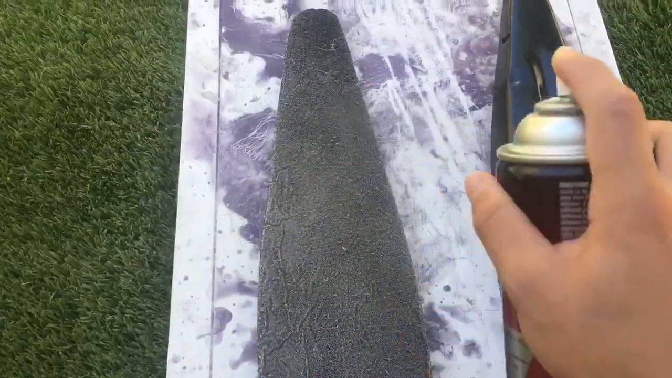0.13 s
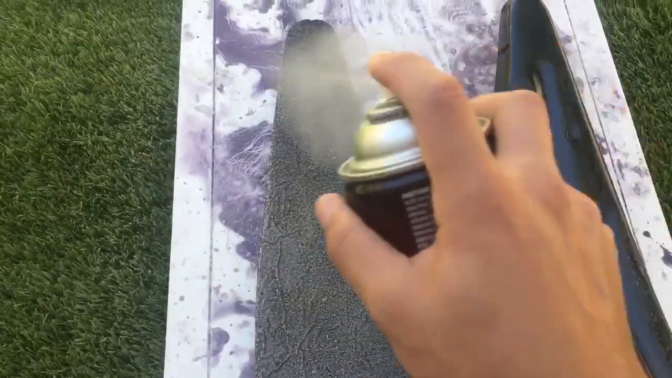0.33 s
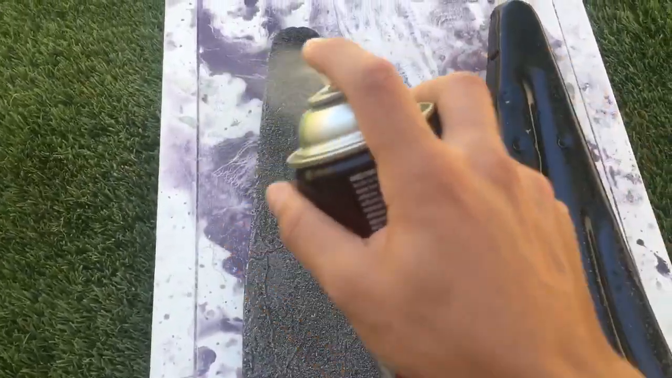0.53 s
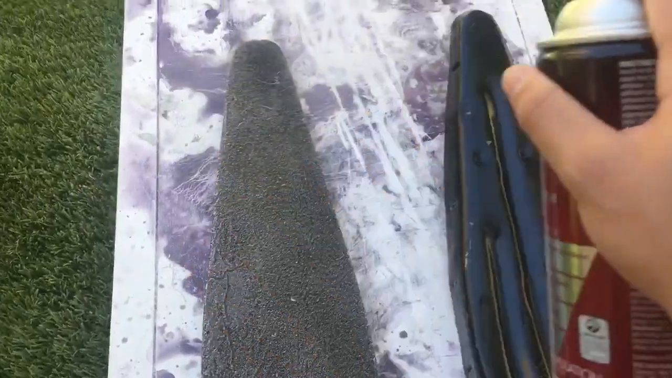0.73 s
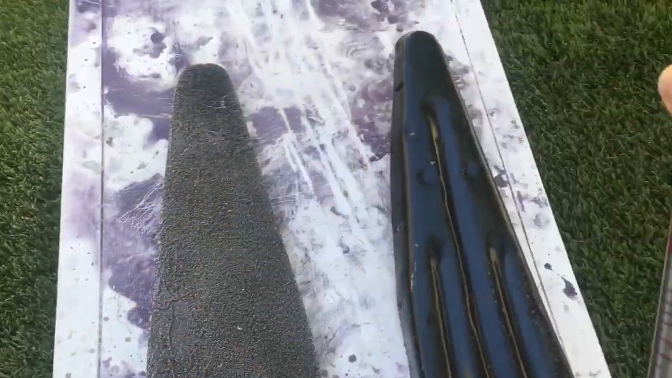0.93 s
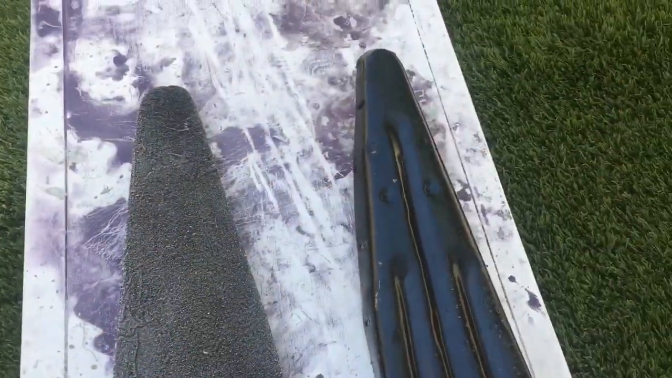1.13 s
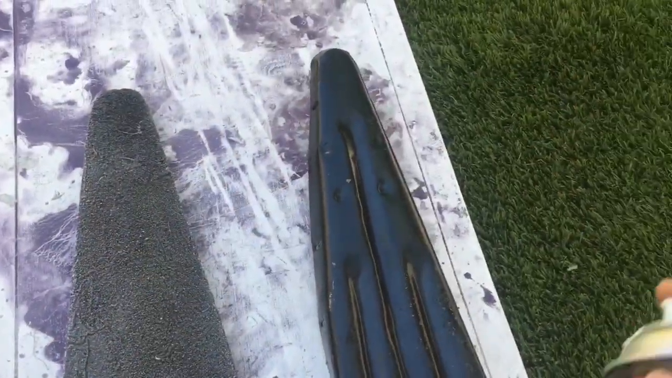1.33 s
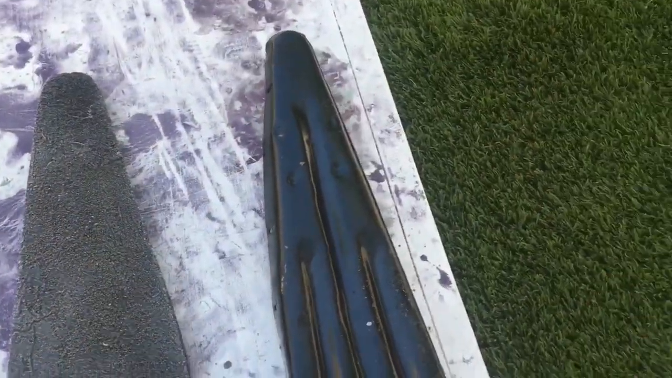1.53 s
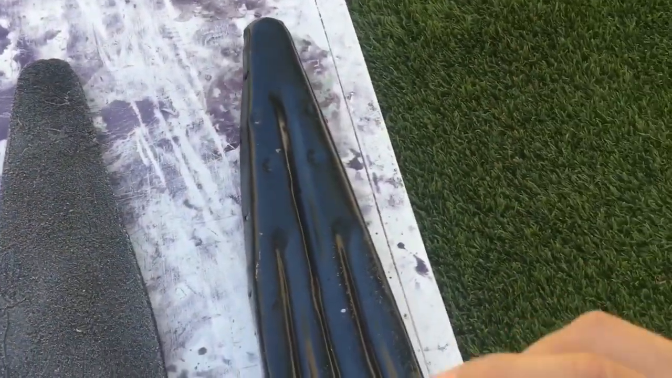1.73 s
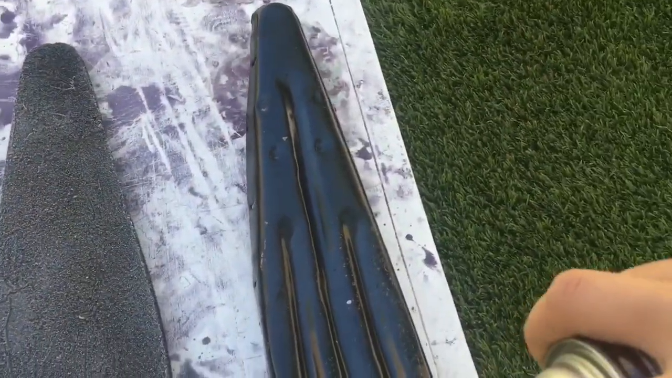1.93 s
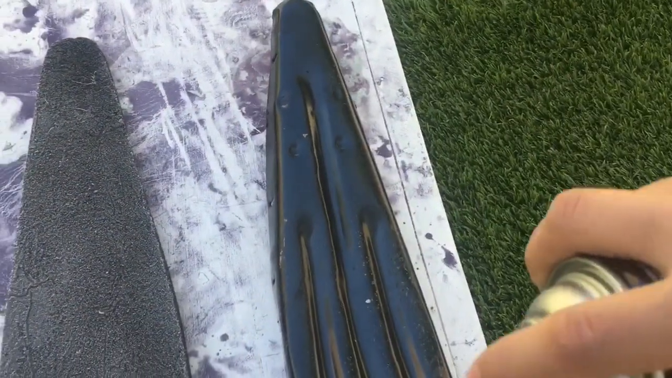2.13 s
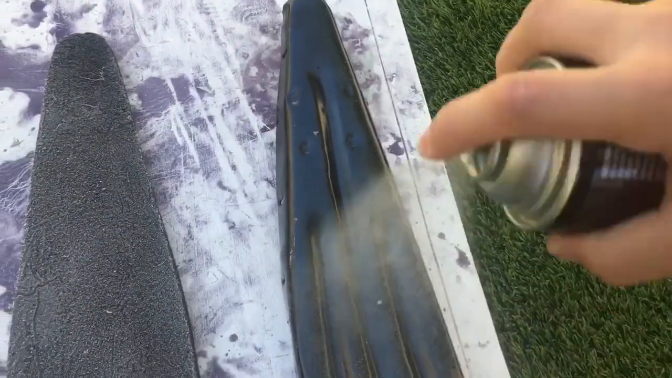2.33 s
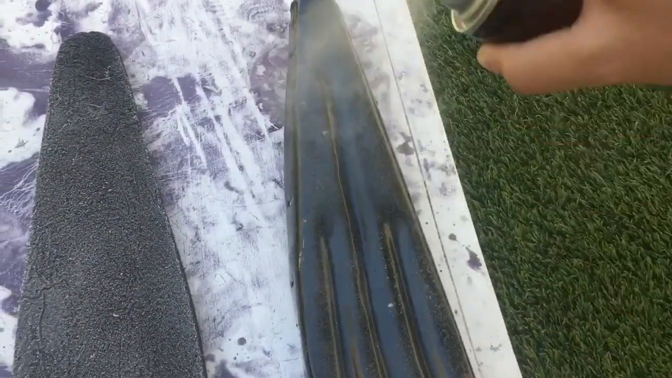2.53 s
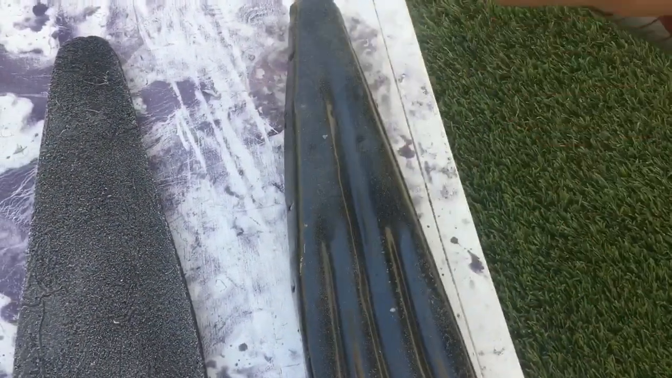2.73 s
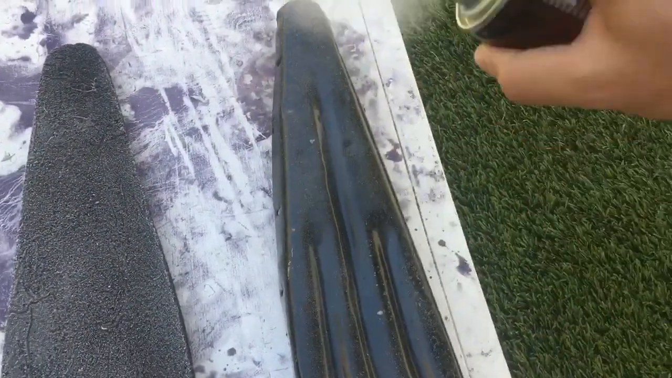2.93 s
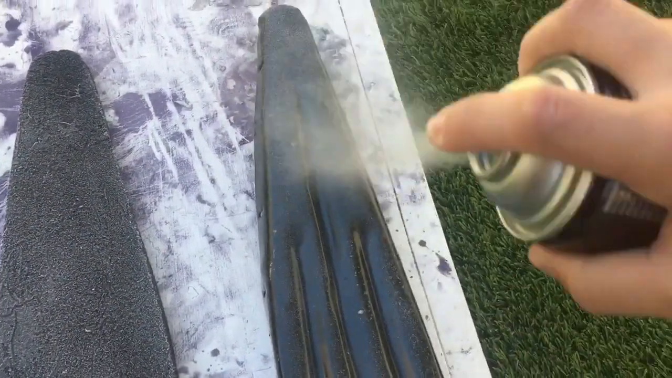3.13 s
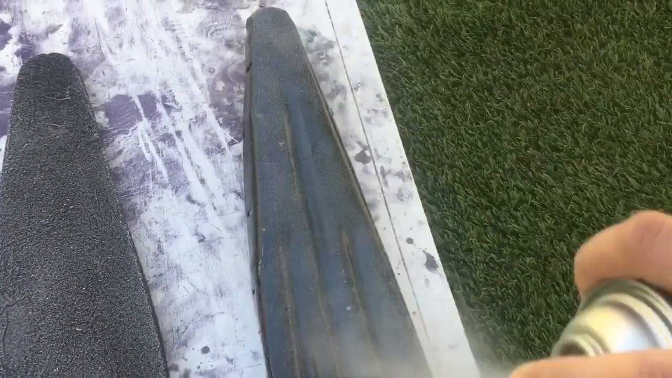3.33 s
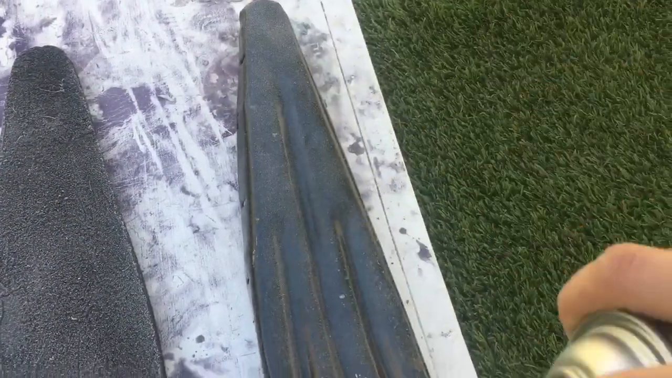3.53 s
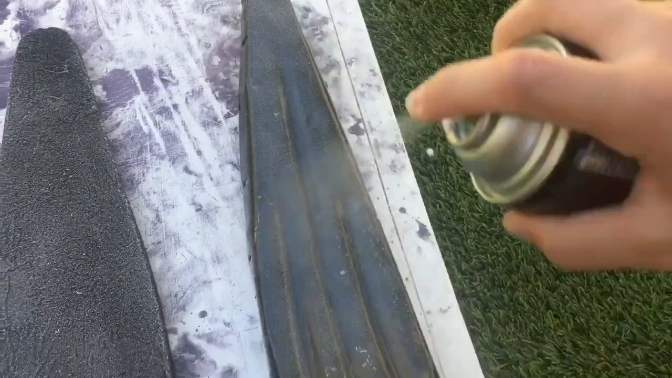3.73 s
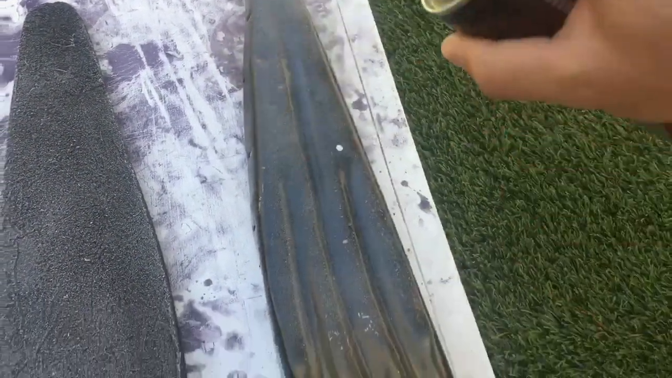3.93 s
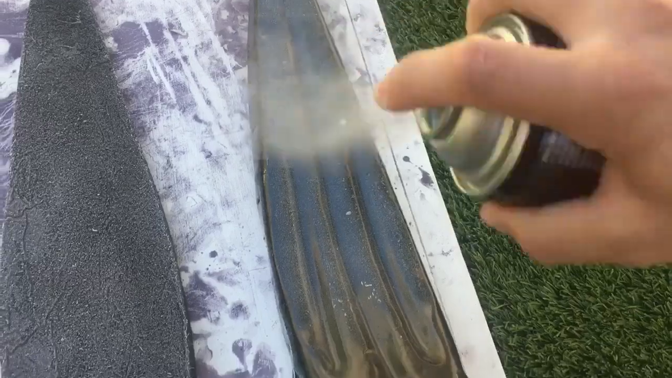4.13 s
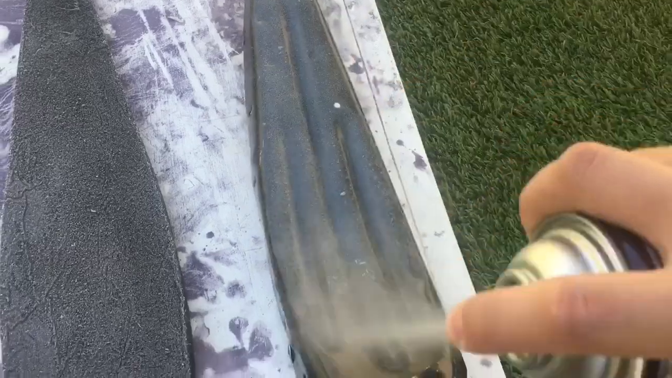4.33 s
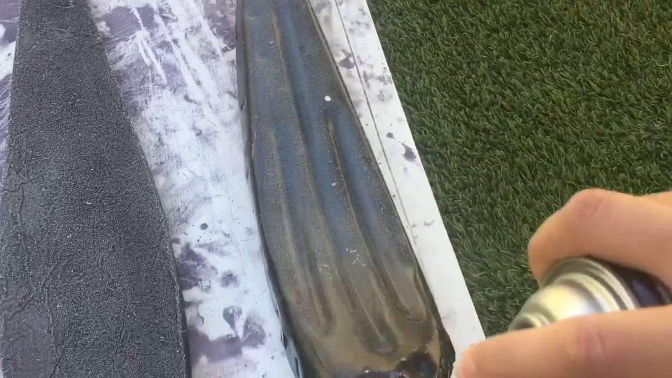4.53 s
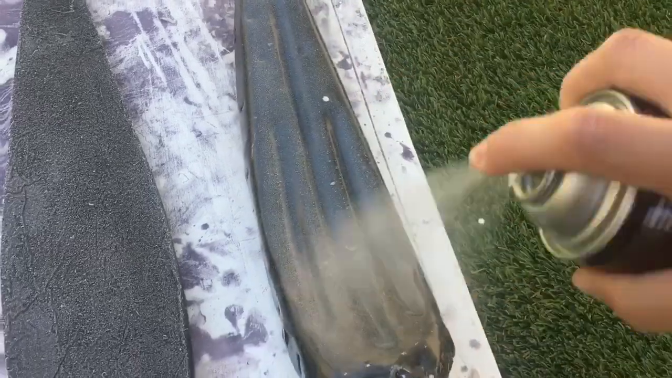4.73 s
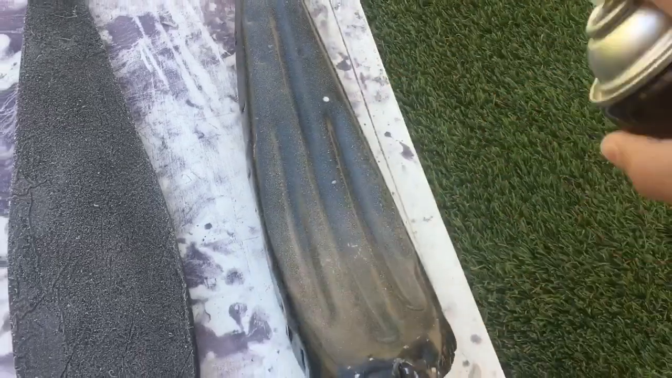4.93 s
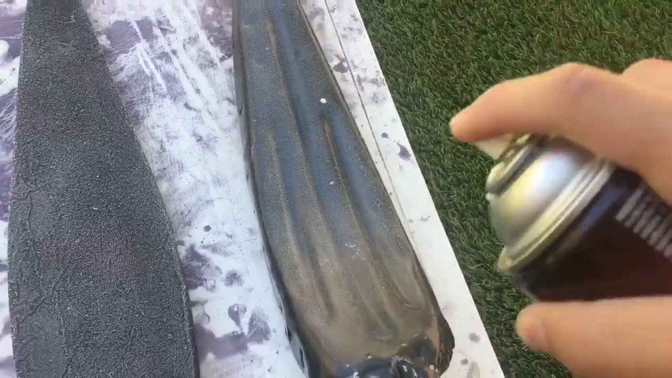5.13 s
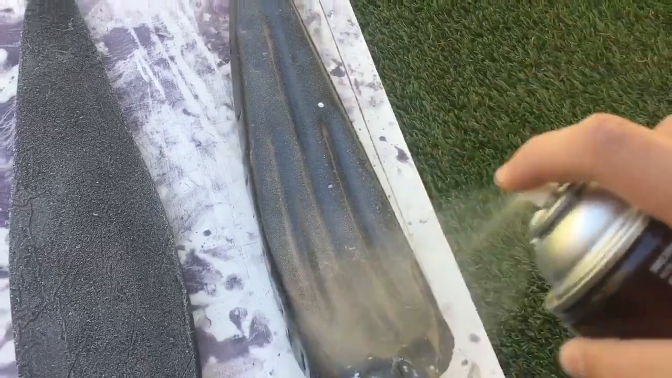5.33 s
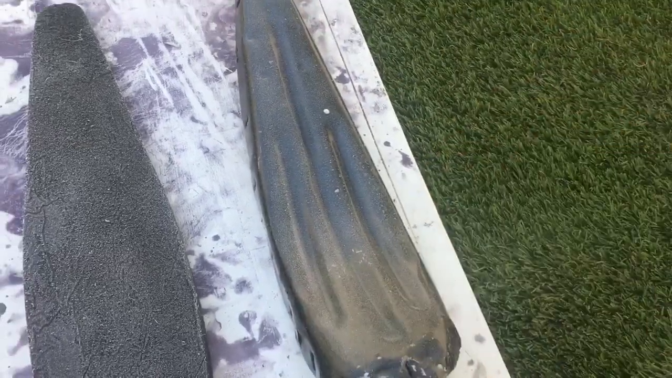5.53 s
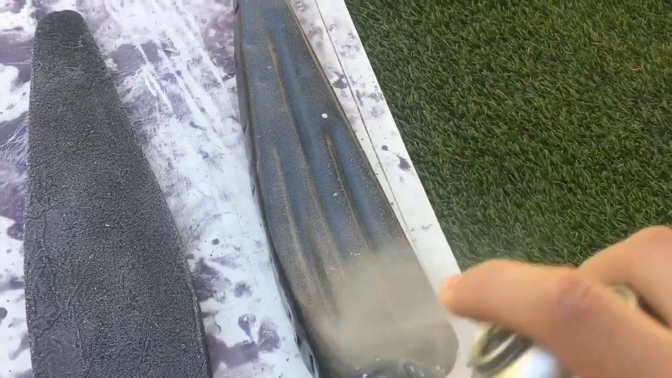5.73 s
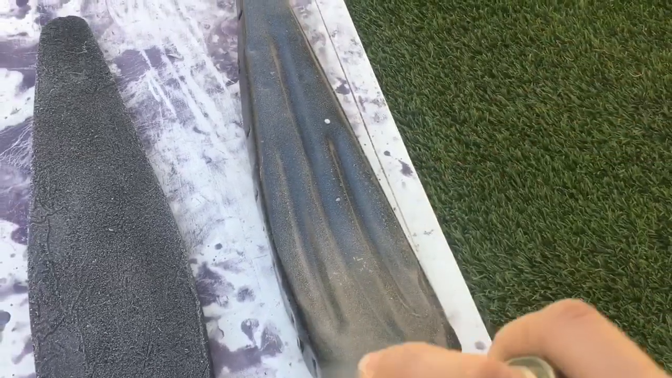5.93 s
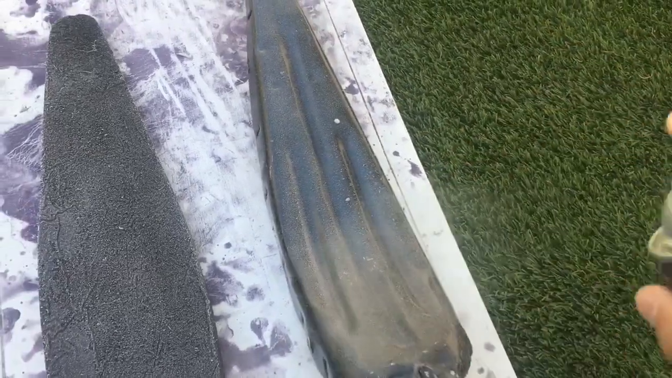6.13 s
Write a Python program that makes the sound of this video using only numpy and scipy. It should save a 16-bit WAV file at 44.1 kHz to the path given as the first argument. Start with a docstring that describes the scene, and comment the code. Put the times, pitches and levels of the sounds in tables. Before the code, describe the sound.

A tiny puff of spray and one hard knock that thuds on a board and rings a steel can come first. The aerosol can gives two quick hisses, then pauses while shoes shift faintly on artificial turf. Eight more bursts follow, longer at first and then short, the hiss changing colour as the can sweeps and glue splashes on foam. The microphone is close, and machinery hums far away.

```python
"""A tiny puff of spray and one hard knock, which thuds on a board and rings a steel can, come first.
Then the aerosol can sprays ten more bursts of glue over foam pieces, close to a mono microphone.
Gas hisses out of the nozzle and glue splashes on the foam. The hiss changes colour as the can sweeps,
because the can shadows its own sound and echoes come back off the board and the foam.
Behind it all, shoes shift on artificial turf and machinery hums far away."""
import sys
import numpy as np
from scipy import signal
from scipy.fft import rfft, irfft, next_fast_len
from scipy.io import wavfile
from scipy.ndimage import uniform_filter1d, map_coordinates

SR = 44100
rng = np.random.default_rng(int(sys.argv[2]) if len(sys.argv) > 2 else 0)


def wav_record(signal):
    """Record a signal, one row per channel, as 16-bit PCM in the file named by sys.argv[1]."""
    frames = np.transpose(np.atleast_2d(signal))
    bounded = np.clip(frames, -1, 1)
    # unit amplitude maps onto the largest positive 16-bit level
    quanta = np.round(bounded * 32767).astype(np.int16)
    wavfile.write(sys.argv[1], SR, quanta)


N = 272890

# Presses of the valve. Each row: start and release in seconds; hiss, swell over the press, splash and
# high fizz in dB; the jet's peak in Hz; that peak's height in dB; extra echo delay in milliseconds.
VALVE_PRESSES = [(-.02, 0.007, -34, 0, -37, -35, 8200, 1, -0.21),
                 (.198, 0.321, -33.5, 1.5, -38, -39.5, 8050, 3.5, -.2),
                 (.496, 0.601, -33, -1.5, -36.5, -38, 8400, 5, -0.18),
                 (2.146, 2.633, -32.5, -1.5, -38.5, -37.5, 8000, 2, -0.0053),
                 (2.791, 3.322, -31.8, 0, -39, -34.5, 8300, 3, 0),
                 (3.555, 3.778, -32, 0, -37, -35, 8350, 2.5, 0),
                 (4.003, 4.339, -33, -0.5, -39, -37, 8100, 3, -0.0068),
                 (4.568, 4.73, -32.5, -2.5, -39, -36.5, 8250, 2, 0),
                 (5.224, 5.369, -33.5, 1.5, -37, -35, 7400, 0.5, 0.012),
                 (5.593, 5.713, -34.7, 2, -36.5, -40.5, 5940, 4, 0.22),
                 (5.911, 6.036, -33.5, -2.5, -35.5, -41, 5570, 4.5, 0.15)]
# The hand's path. Each row: time in seconds, nearness (0 at the foam's far tip, 1 by the microphone).
CAN_PATH = [(.21, .2), (.34, .7), (.5, .3), (.62, .95), (2.3, 1.05), (2.42, .33), (2.52, .13), (2.65, 0),
            (2.89, .18), (2.98, .45), (3.1, .92), (3.58, .97), (3.76, .45), (4.08, .92), (4.72, .97),
            (5.23, .65), (5.39, .1), (5.6, .9)]
# The wrist turns and the can hides its nozzle.
# Each row: time in seconds, muffled pitch in Hz, depth in dB, half-length in seconds.
WRIST_TURNS = [(.25, 5400, 4, 0.32), (2.16, 6870, 9, 0.11), (3.3, 6070, 11.5, 0.12), (3.713, 6450, 6, .09),
               (4.347, 6350, 13, .09), (4.72, 6650, 6, 0.11), (5.394, 5260, 6.5, .08)]
# Brief dips in the spray. Each row: time in seconds, depth in dB, half-length in seconds.
FLOW_DIPS = [(2.366, 1, .04), (3.037, 1, .05), (3.723, 5, 0.027), (5.655, 1.5, 0.016)]
# The knock's quick contacts. Each row: start in seconds, thud strength in dB, metal strength in dB.
KNOCK_CONTACTS = [(0.0753, -36, -26), (0.0774, -29, -27.5), (0.0838, -11.5, -30.5), (0.0894, -28.5, -38),
                  (.104, -25.5, -40)]
# The notes of the struck board and can. Each row: pitch in Hz, strength in dB, seconds to fade by 60 dB.
BOARD_NOTES = [(137.4, -25, 1), (254, -4.5, 0.11), (296, 1.5, 0.038), (362, -2.5, 0.12), (456, -10, 0.11),
               (494, -15, .07), (577, -7.5, 0.1), (710, -3.5, 0.049), (790, -4, 0.08), (910, -2.5, 0.087),
               (1045, -8.5, 0.1), (1120, -3.5, 0.11), (1177, -9, 0.075), (1640, -22, 0.12),
               (2010, -14, .11)]
CAN_NOTES = [(2430, -17, 0.16), (2660, -4.5, 0.17), (3280, -15, 0.16), (3610, -9, 0.5), (3880, -17, 0.42),
             (4430, -16, .32), (4420, -12, 0.24), (4580, -7, .17), (5100, -15, 0.28), (5330, -11, .17),
             (7380, -18, 0.092)]
# The can ticks in the hand. Each row: start in seconds, level in dB, pitch in Hz.
CAN_TICKS = [(2.7235, -30.5, 2220)]
# Short swells of noise. Each row: middle in seconds, level in dB, half-length in seconds.
GLUE_GURGLES = [(3.638, -35, 0.0065), (3.753, -33.5, 0.0089), (3.783, -37, 0.0082)]
SHOE_SCUFFS = [(1.213, -55.5, 0.038), (1.3, -59, 0.034), (1.43, -58, 0.068), (1.635, -54.5, 0.024),
               (3.455, -56.5, 0.025), (4.948, -55, 0.015)]
SHOE_STEPS = [(4.945, -43, 0.016)]
# The colour of each noise, from low to high. Each row: frequency in Hz, relative strength in dB.
NOZZLE_COLOUR = [(2350, -46), (4000, -10), (5400, -3), (7000, -2.5), (8900, -1), (9600, -3.5), (10400, -5),
                 (11300, -2), (13300, -4), (14800, 0.5), (15700, -5)]
SPLASH_COLOUR = [(400, -37), (800, -12.5), (1300, -9.5), (1800, -3), (2400, 0.5), (2950, -2), (3400, 1.5),
                 (4400, -4), (5200, -21.5), (7000, -31)]
PATTER_COLOUR = [(300, -24), (600, -6), (1300, 1), (1700, -5), (2600, -32)]
GURGLE_COLOUR = [(1200, -33), (1900, -7), (2350, -3), (2700, -6), (3400, -31)]
CRACK_COLOUR = [(200, -27), (600, 4), (2000, -3), (3000, -7), (4500, -7.5), (7300, -8), (7700, -12),
                (15000, -29)]
TURF_COLOUR = [(250, -14), (800, 6), (2000, -9), (3800, 3), (6000, -0.5), (9000, -2.5), (12000, -3),
               (16000, -15)]
STEP_COLOUR = [(150, -20), (400, 2), (900, -3), (1900, -1), (3000, -13), (6000, -17), (9000, -35)]
AIR_COLOUR = [(120, -15), (250, 0), (370, -4), (450, -4), (570, -10), (700, -7), (816, -11.5), (930, -9),
              (1400, -14), (2050, -18), (3170, -23), (5000, -27), (8850, -33), (16000, -47)]
RUMBLE_COLOUR = [(20, -44), (35, -12), (52, 1.5), (72, -2.5), (100, 1), (145, -2.5), (190, 3), (250, -6.5),
                 (300, -9.5), (350, -24.5), (500, -49.5)]
# Far machinery. Each row: pitch in Hz, level in dB.
MACHINE_HUM = [(53.8, -52.5), (96, -52.5), (120, -53.5), (192, -57), (296, -57), (883, -63.5), (942, -60),
               (1001, -64)]
# Thin, faint tones. Each row: start in seconds, end in seconds, pitch in Hz, level in dB.
FAINT_WHINES = [(1.7, 2.14, 5330, -70.5), (4.38, 5.2, 5330, -72), (5.42, 6.22, 3080, -66),
                (5.42, 6.22, 4560, -72)]


def spray(split_hz=10300, wet_s=0.03, near_hiss_db=2, near_splash_db=4, near_fizz_db=7.5):
    """Rushing gas hisses at the nozzle and glue splashes on the foam, both louder as the can nears."""
    t = clock()
    age, progress, hiss_db, swell_db, splash_db, fizz_db, *_ = press_at(t)
    near = follow_can(t)
    # Each press starts wet, with more splash and less hiss, until the jet breaks up into mist.
    wet = np.exp(-age / wet_s)
    level_db = hiss_db + near_hiss_db * near - 3 * wet
    splash_vs_hiss_db = splash_db + near_splash_db * near + 2 * wet - level_db
    fizz_vs_hiss_db = fizz_db - hiss_db + (near_fizz_db - near_hiss_db) * near
    high_share = lambda hz: 1 / (1 + (split_hz / (hz + 1)) ** 16)
    lows = unit(filtered(noise(NOZZLE_COLOUR), lambda hz: np.sqrt(1 - high_share(hz))))
    highs = unit(filtered(noise(NOZZLE_COLOUR), lambda hz: np.sqrt(high_share(hz))))
    hiss = amp(0.5) * moving_filter(lows, jet_peak)
    fizz = amp(1 + fizz_vs_hiss_db) * highs
    splash = amp(splash_vs_hiss_db - 0.5) * noise(SPLASH_COLOUR)
    splash += amp(-13 + 2.43 * splash_vs_hiss_db) * noise(PATTER_COLOUR)  # a harder jet patters lower
    splash *= amp(0.87 * wobble(260))  # glue lands in uneven clumps
    sputter_db = 0.54 * wobble(700) + 0.4 * wobble(70)  # gas and liquid take turns in the nozzle
    dip_db = sum(db * bell(t, when, half) for when, db, half in FLOW_DIPS)
    flow = amp(level_db + swell_db * (progress - 0.5) - dip_db + sputter_db)
    gas = (hiss + fizz) * (valve(open_s=0.0044, shut_s=0.093) + spit())
    glue = splash * valve(open_s=0.002, shut_s=0.095)
    shadowed = moving_filter(flow * (gas + glue), can_shadow)
    return echoes(moving_filter(shadowed, scatter))


def valve(open_s, shut_s):
    """The flow starts within milliseconds and chokes ever faster after each release."""
    t = clock()
    flow = np.zeros(N)
    for start, release, *_ in VALVE_PRESSES:
        opening = 1 - np.exp(-np.maximum(t - start, 0) / open_s)
        closing = amp(-60 * (np.maximum(t - release, 0) / shut_s) ** 1.49)
        flow += opening * closing
    return flow


def spit(strength_db=-9, life_s=0.0027):
    """Pressure trapped behind the valve escapes in a brief extra puff at each opening."""
    t = clock()
    puffs = sum((t > start) * np.exp(-np.abs(t - start) / life_s) for start, *_ in VALVE_PRESSES)
    return amp(strength_db) * puffs


def jet_peak(hz, s, width_hz=780, rise_octaves=0.31, lead_s=0.11):
    """The jet gathers its power round one pitch, which rises as the can comes near."""
    *_, peak_hz, height_db, _ = press_at(s)
    peak = bell(hz, peak_hz * 2 ** (rise_octaves * follow_can(s)), width_hz)
    # Just before each turn the jet points at the microphone and its peak flares.
    flare_db = 0.4 * sum(db * bell(s, when - lead_s, 0.052) for when, _, db, _ in WRIST_TURNS)
    return height_db * (peak - 0.5) + flare_db * peak


def can_shadow(hz, s, notch_width_hz=430, boost_width_hz=520):
    """Sound passing either side of the can cancels in one band and adds up in a lower one."""
    notch = lambda at_hz: 1 / (1 + ((hz - at_hz) / notch_width_hz) ** 2)
    boost = lambda at_hz: 0.33 * bell(hz, 0.72 * at_hz, boost_width_hz)
    return sum(db * bell(s, when, half) * (boost(at_hz) - notch(at_hz))
               for when, at_hz, db, half in WRIST_TURNS)


def scatter(hz, s, ripple_db=1.5):
    """Faint reflections off fingers and table put random, shifting ripples in the sound's colour."""
    ripples = rng.standard_normal((len(hz), len(s)))
    for size, axis in (24, 1), (16, 1), (2, 0):  # smooth twice along time, once along frequency
        ripples = uniform_filter1d(ripples, size=size, axis=axis)
    return ripple_db * unit(ripples)


def echoes(x, board_ms=(1.335, 1.505), edge_ms=(1.14, 1.46)):
    """Echoes off the board and the foam's edge colour the spray. Each pair is (can far, can near)."""
    t = clock()
    *_, extra_ms = press_at(t)

    def delayed(far_near_ms):
        lag = (follow_can(t, far_near_ms) + extra_ms) * SR / 1000
        return map_coordinates(x, [np.arange(N) - lag], order=5)

    board_share, edge_share = follow_can(t, (0.38, 0.17)), follow_can(t, (0.31, 0.06))
    # The echo bent round the edge arrives upside down.
    mix = x + board_share * delayed(board_ms) - edge_share * delayed(edge_ms)
    return mix / np.sqrt(1 + board_share ** 2 + edge_share ** 2)


def press_at(s):
    """For the times s: the press's age, its progress (0 to 1), and its columns from the hiss on."""
    rows = np.array(VALVE_PRESSES)
    handovers = (rows[:-1, 1] + 3 * rows[1:, 0]) / 4  # three quarters of the way through each pause
    start, release, *columns = rows[np.searchsorted(handovers, s)].T
    age = np.maximum(s - start, 0)
    return age, np.minimum(age / (release - start), 1), *columns


def follow_can(s, far_near=(-0.5, 0.5)):
    """A value that slides between its far and near settings as the can sweeps."""
    far, near = far_near
    return far + (near - far) * np.interp(s, *np.transpose(CAN_PATH))


def gurgles():
    """Glue gurgles briefly in the nozzle."""
    return swells(GLUE_GURGLES) * noise(GURGLE_COLOUR)


def knock(crack_fade_s=0.053, wash_fade_s=0.26):
    """A few quick contacts thud the board and ring the can; a short wash of scattered sound follows."""
    out = np.zeros(N)
    t = np.arange(SR * 3 // 4) / SR
    crack_and_wash = amp(1 - 60 * t / crack_fade_s) + amp(-14 - 60 * t / wash_fade_s)
    for start, thud_db, metal_db in KNOCK_CONTACTS:
        span = slice(round(start * SR), round(start * SR) + len(t))
        crack = crack_and_wash * noise(CRACK_COLOUR)[span]
        metal = amp(-6) * ring(CAN_NOTES, t, vary_db=3) + crack
        thud = ring(BOARD_NOTES, t, vary_db=2)
        out[span] += amp(thud_db - 4.5) * thud + amp(metal_db) * metal
    return out


def ring(notes, t, vary_db):
    """A struck object's notes fade away, at new strengths for each blow. Every other one is flipped."""
    out = np.zeros(len(t))
    for k, (hz, db, fade_s) in enumerate(notes):
        fade = amp(db + vary_db * rng.standard_normal() - 60 * t / fade_s)
        out += (-1) ** k * fade * np.sin(2 * np.pi * hz * t)
    return out


def can_tick(fade_s=0.025):
    """The can gives a short ping, which the hand damps."""
    out = np.zeros(N)
    for start, db, hz in CAN_TICKS:
        t = np.maximum(clock() - start, 0)
        out += amp(db - 60 * t / fade_s) * np.sin(2 * np.pi * hz * t)
    return out


def shoes(grain_db=3.5):
    """Plastic blades of turf flick under a shoe, which then settles with a dull step."""
    blades = unit(noise(TURF_COLOUR) * amp(grain_db * wobble(350)))
    return swells(SHOE_SCUFFS) * blades + swells(SHOE_STEPS) * noise(STEP_COLOUR)


def background(air_db=-45.5, rumble_db=-41, whine_fade_s=0.04):
    """Far machinery hums unsteadily, along with faint whines, soft air and a low rumble."""
    t = clock()
    tone = lambda hz, drift: np.sqrt(2) * np.sin(2 * np.pi * hz * t + drift * wobble(9))
    fade = lambda start, end: np.clip(np.minimum(t - start, end - t) / whine_fade_s, 0, 1)
    hum = sum(amp(db + 2.1 * wobble(7.4)) * tone(hz, drift=1.22) for hz, db in MACHINE_HUM)
    whine = sum(amp(db) * fade(start, end) * tone(hz, drift=0.85) for start, end, hz, db in FAINT_WHINES)
    air = amp(air_db + 1.06 * wobble(3.08)) * noise(AIR_COLOUR)
    rumble = amp(rumble_db + 0.1 * wobble(20)) * noise(RUMBLE_COLOUR)
    return air + rumble + hum + whine


def amp(db):
    """Turn decibels into a number to multiply by."""
    return 10 ** (np.asarray(db) / 20)


def unit(x):
    """Scale x to an average power of 1."""
    return x / np.sqrt(np.mean(x ** 2) + 1e-20)


def clock():
    """The time of each sample in seconds."""
    return np.arange(N) / SR


def bell(x, centre, half):
    """A smooth bump of height 1 round a centre."""
    return np.exp(-0.5 * ((x - centre) / half) ** 2)


def swells(rows):
    """A smooth rise and fall in loudness for each row."""
    return sum(amp(db) * bell(clock(), when, half) for when, db, half in rows)


def wobble(rate):
    """A smooth curve through `rate` random points a second."""
    return map_coordinates(rng.standard_normal(int(N * rate / SR) + 4), [np.arange(N) * rate / SR])


def noise(colour):
    """Noise shaped by a colour table, with an average power of 1."""
    points_hz, db = np.transpose(colour)
    gain = lambda hz: amp(np.interp(np.log(hz + 1), np.log(points_hz), db))
    return unit(filtered(rng.standard_normal(N), gain))


def filtered(x, gain):
    """Multiply each frequency in x by gain(hz)."""
    size = next_fast_len(N + 8192)
    return irfft(rfft(x, size) * gain(np.fft.rfftfreq(size, 1 / SR)), size)[..., :N]


def moving_filter(x, gain_db):
    """Change the colour of x over time by gain_db(frequency in Hz, time in seconds)."""
    hz, s, frames = signal.stft(x, SR, nperseg=256)
    return signal.istft(frames * amp(gain_db(hz[:, None], s)), SR, nperseg=256)[1][:N]


def scene():
    """Everything reaches one microphone, the same on both channels."""
    mono = spray() + gurgles() + knock() + can_tick() + shoes() + background()
    return np.array([mono, mono])


def record(dry, dip_hz=10400, dip_db=3, dip_width_hz=330, top_hz=15780):
    """The microphone's opening weakens one narrow band; the recorder cuts off the highest treble."""
    opening = lambda hz: amp(-dip_db / (1 + ((hz - dip_hz) / dip_width_hz) ** 2))
    cutoff = lambda hz: 1 / (1 + (hz / top_hz) ** 400)
    return filtered(dry, lambda hz: opening(hz) * cutoff(hz))


dry = scene()
out = record(dry)
wav_record(out)
```